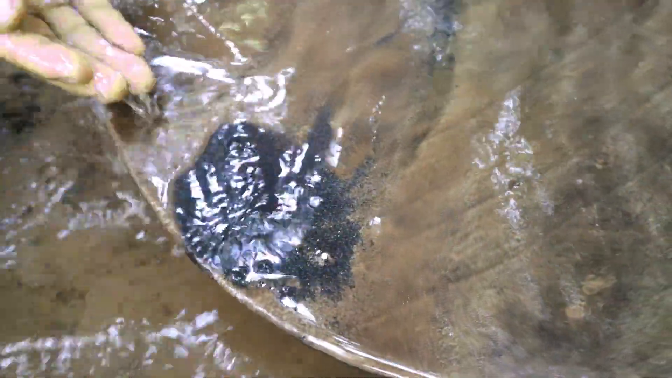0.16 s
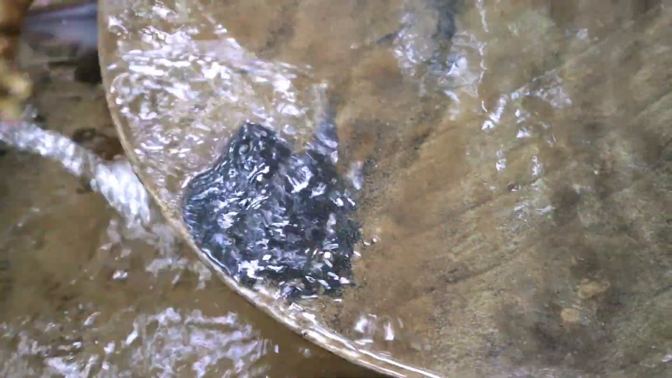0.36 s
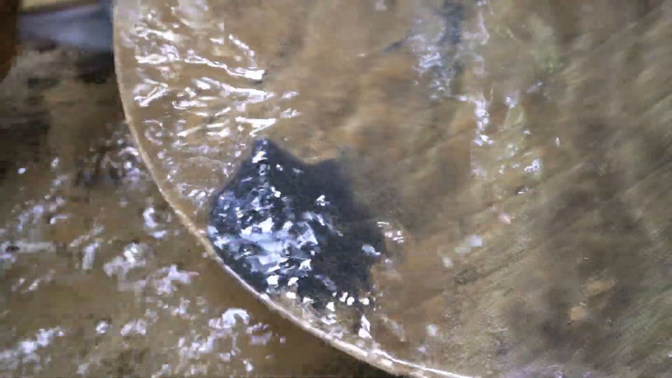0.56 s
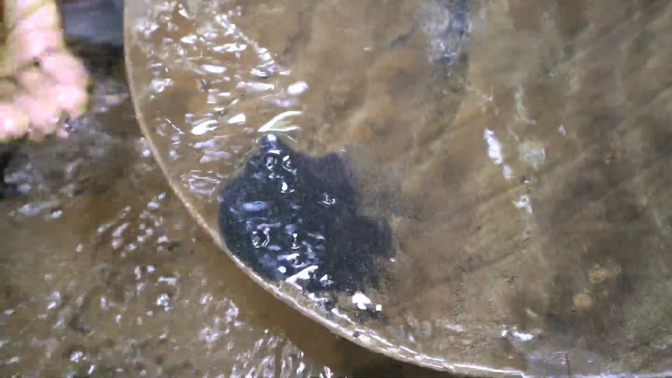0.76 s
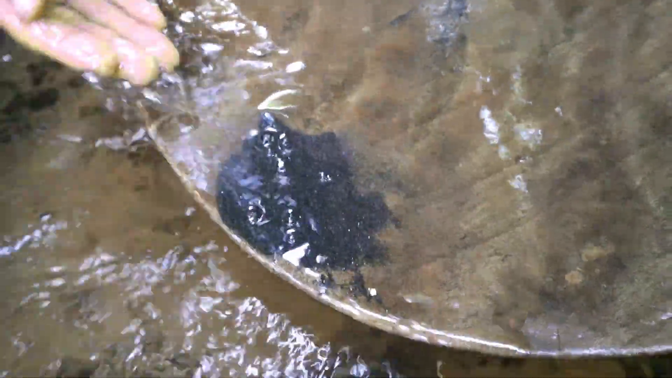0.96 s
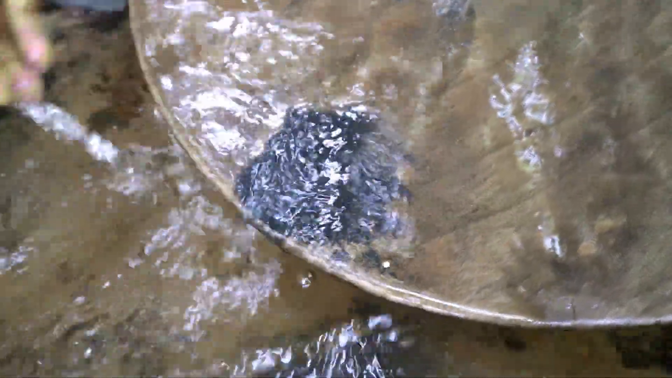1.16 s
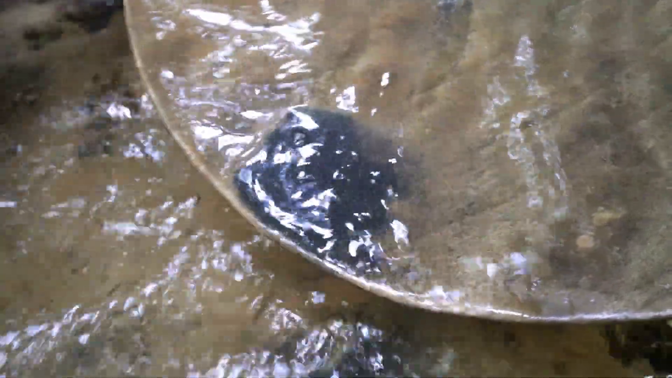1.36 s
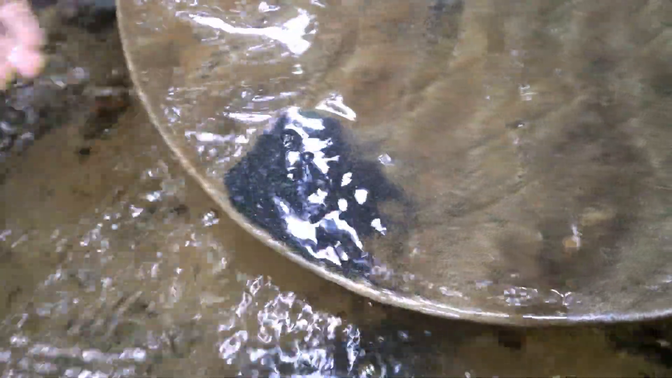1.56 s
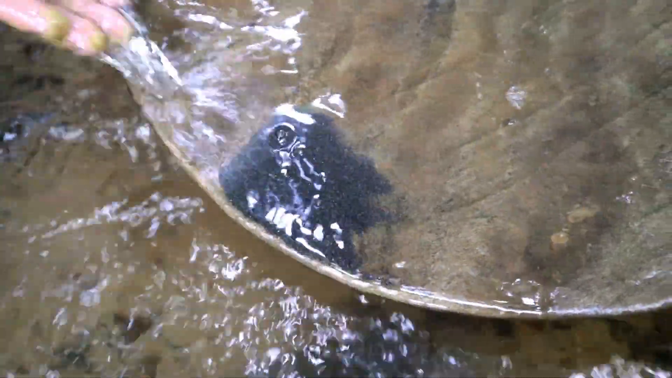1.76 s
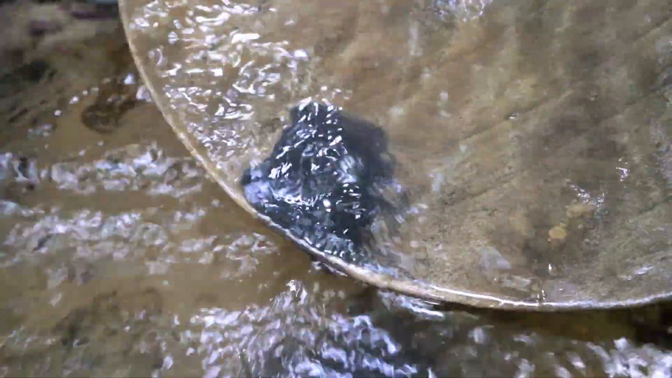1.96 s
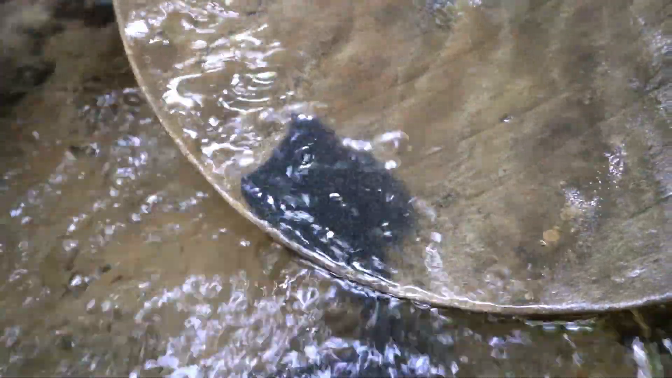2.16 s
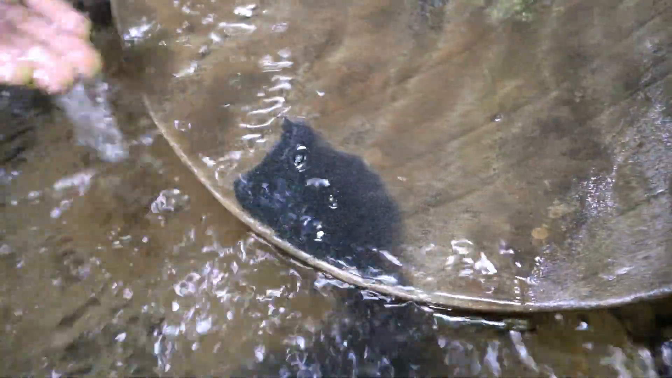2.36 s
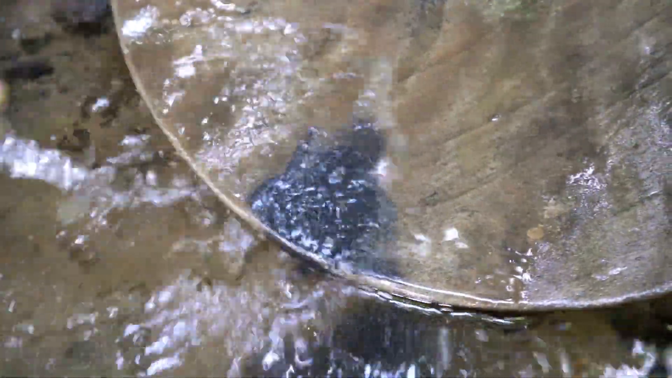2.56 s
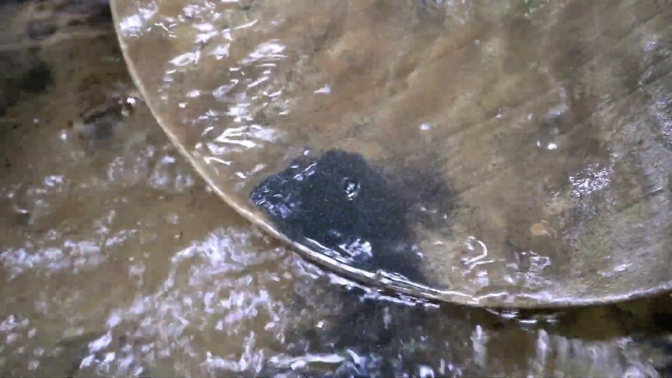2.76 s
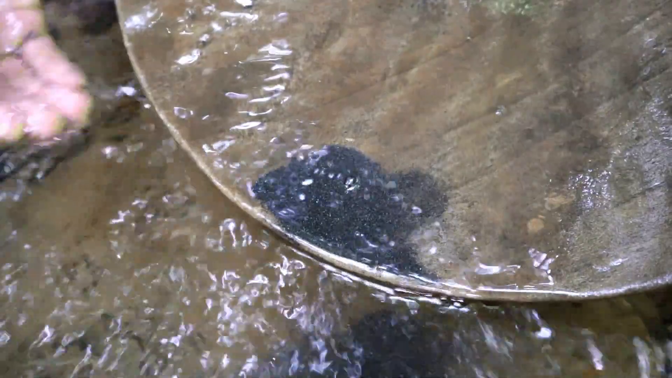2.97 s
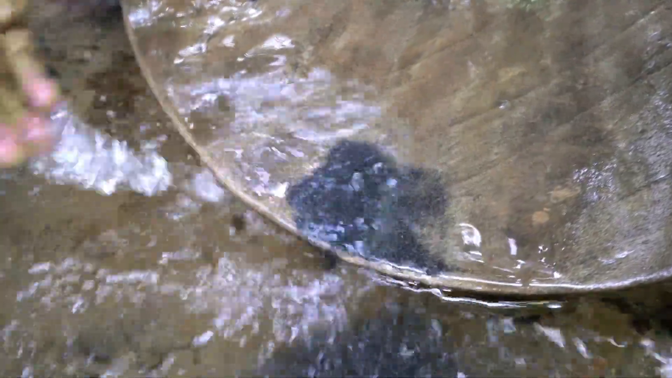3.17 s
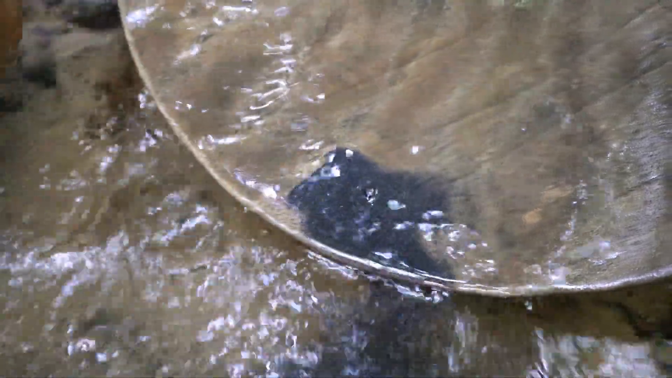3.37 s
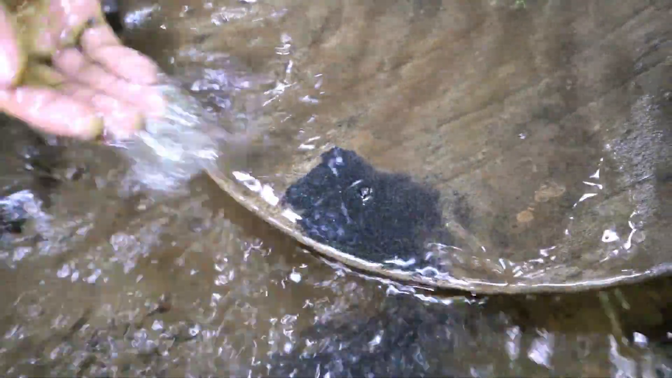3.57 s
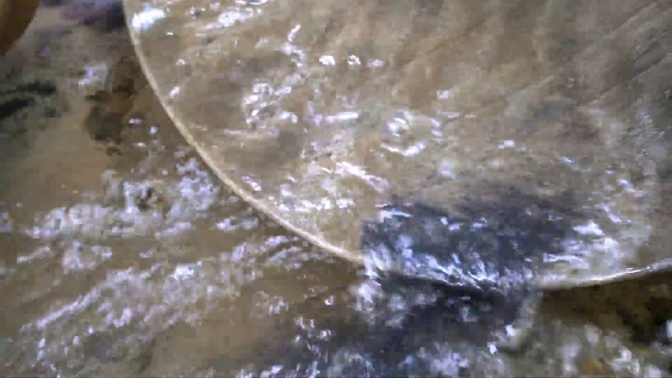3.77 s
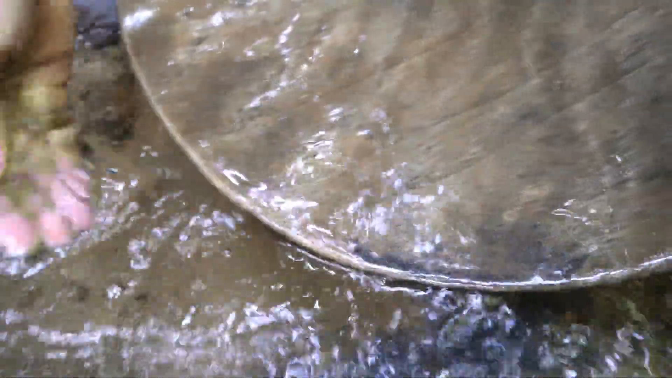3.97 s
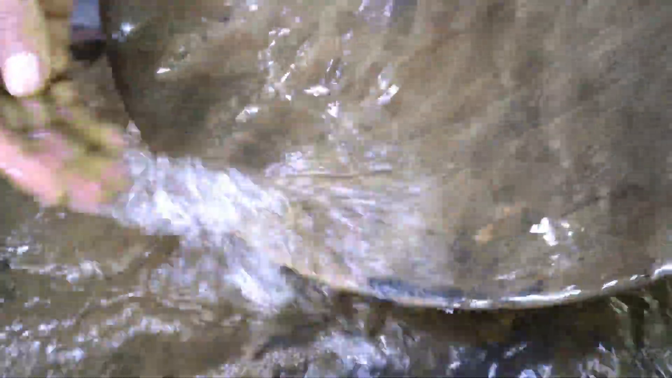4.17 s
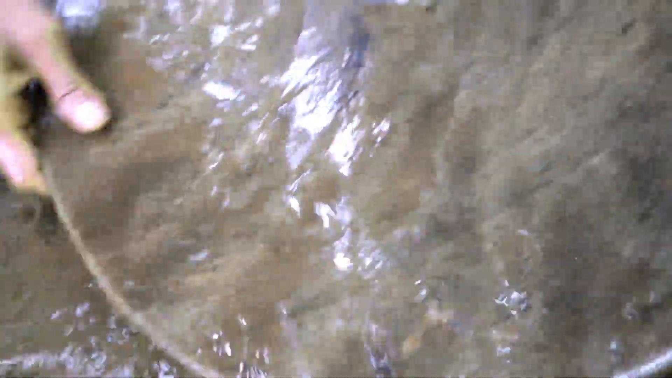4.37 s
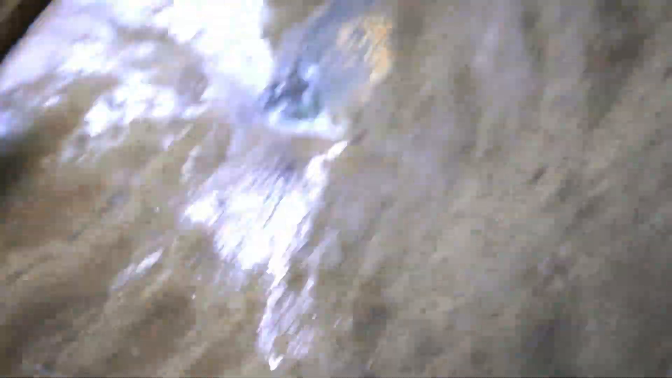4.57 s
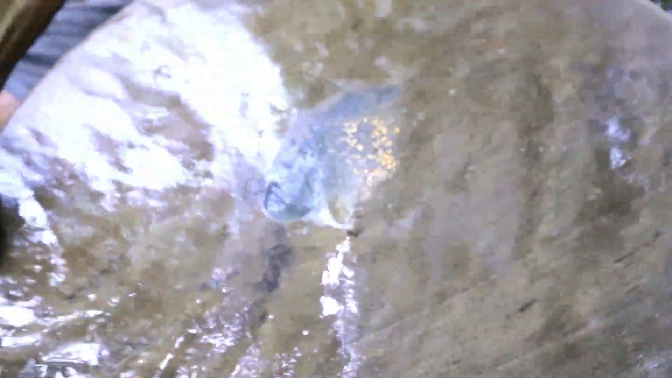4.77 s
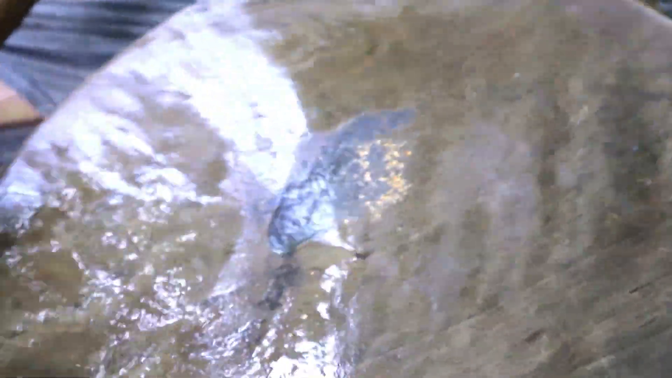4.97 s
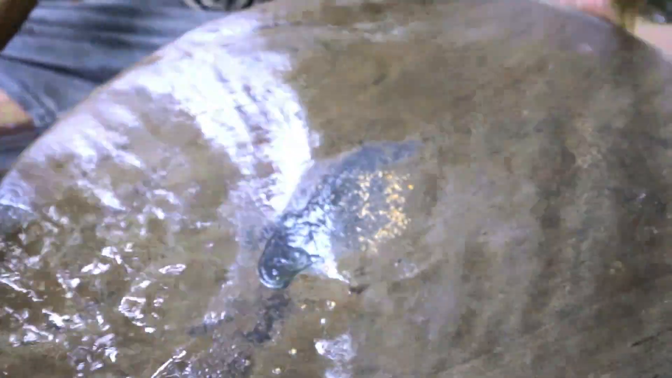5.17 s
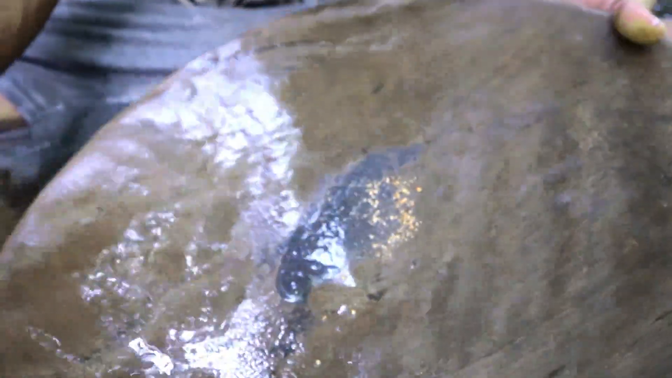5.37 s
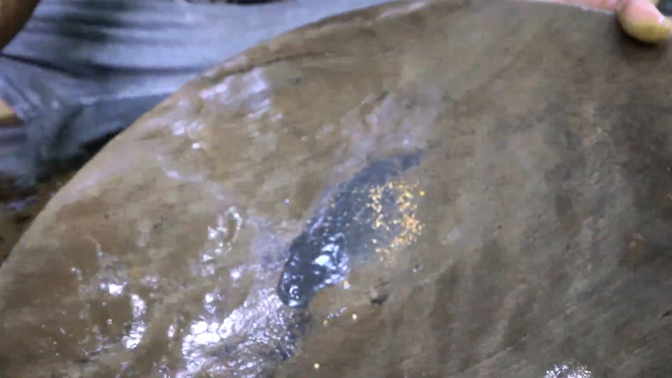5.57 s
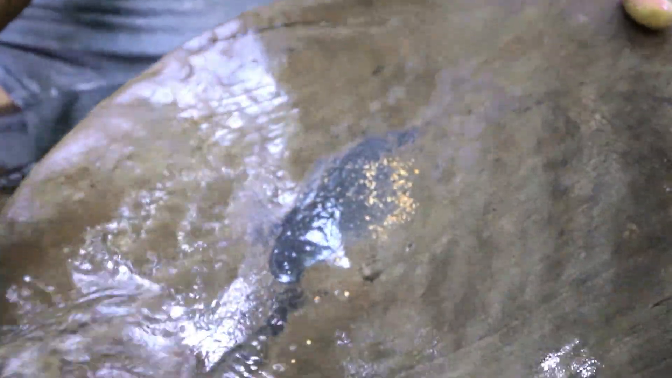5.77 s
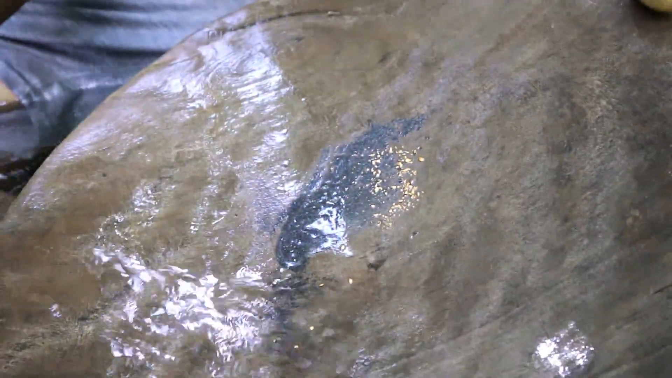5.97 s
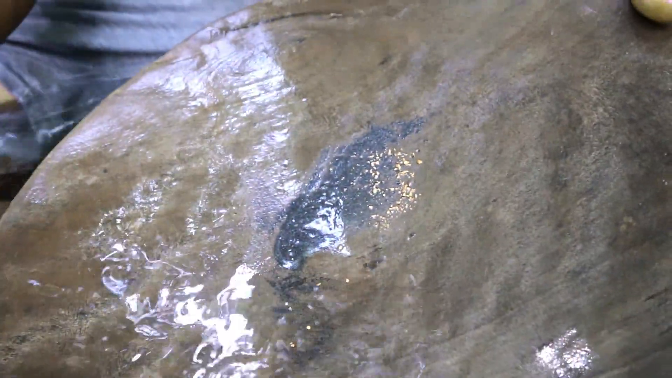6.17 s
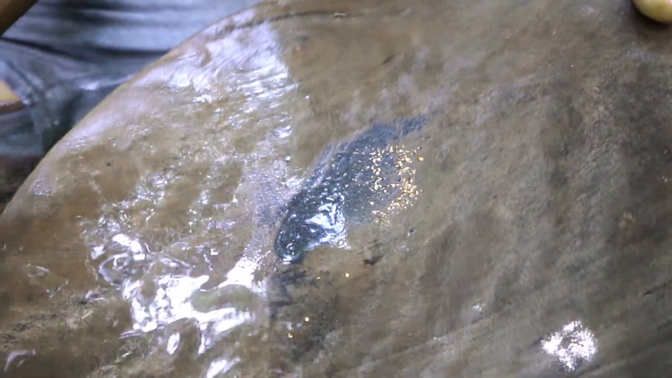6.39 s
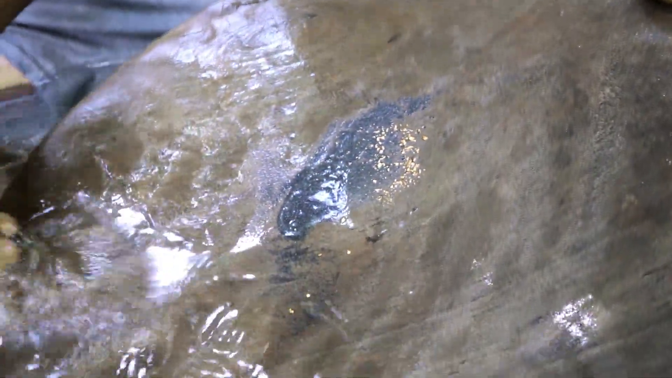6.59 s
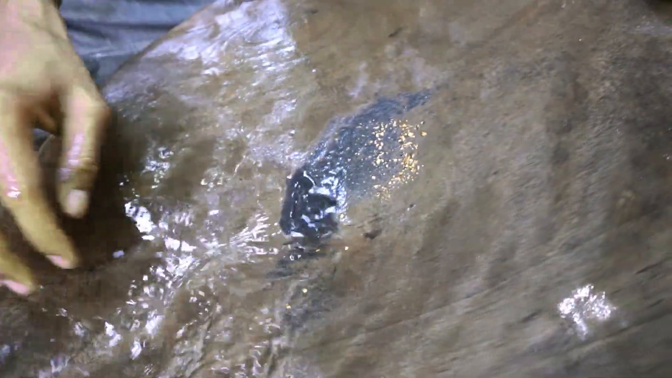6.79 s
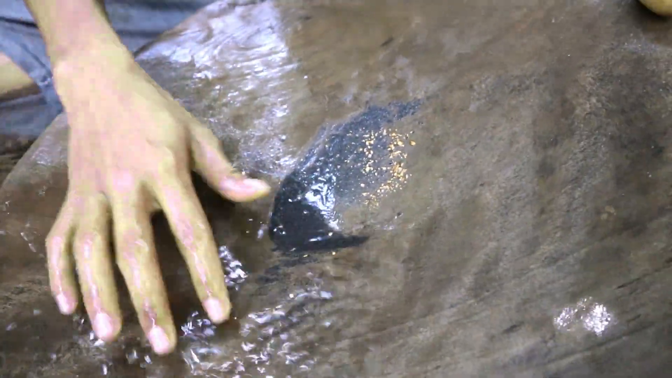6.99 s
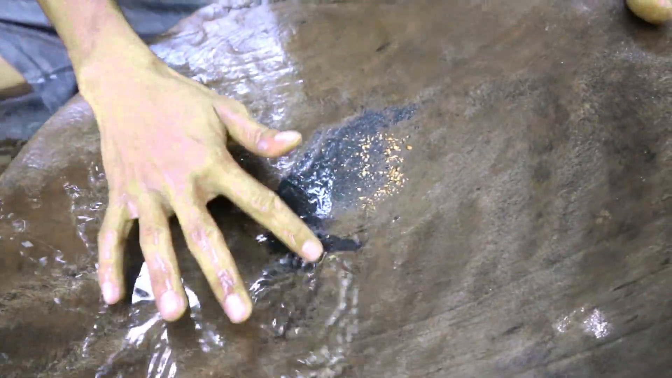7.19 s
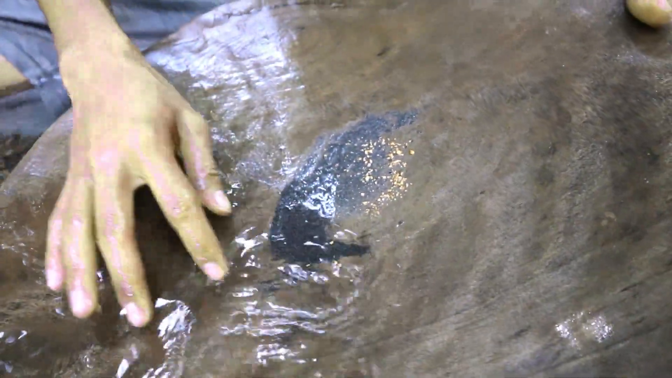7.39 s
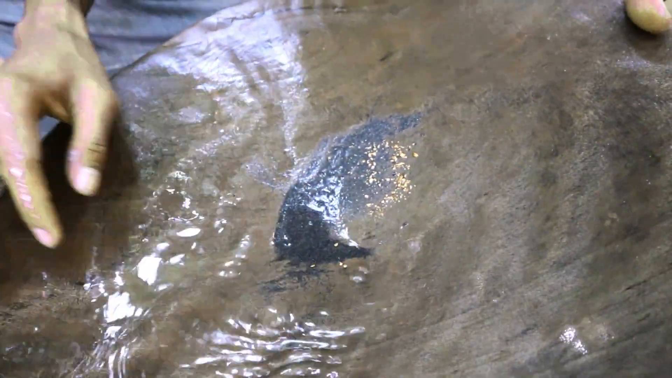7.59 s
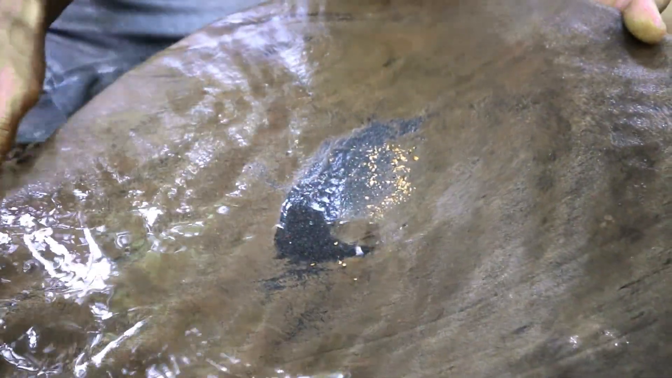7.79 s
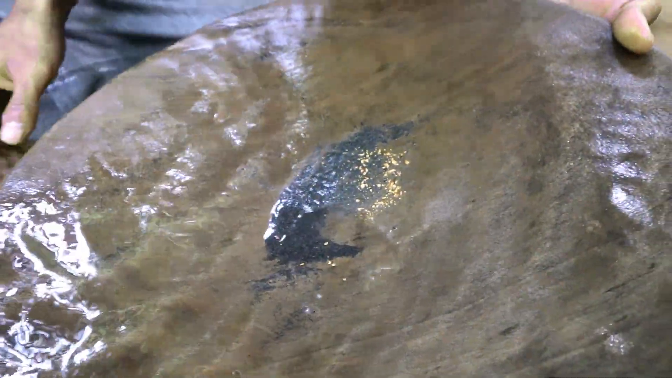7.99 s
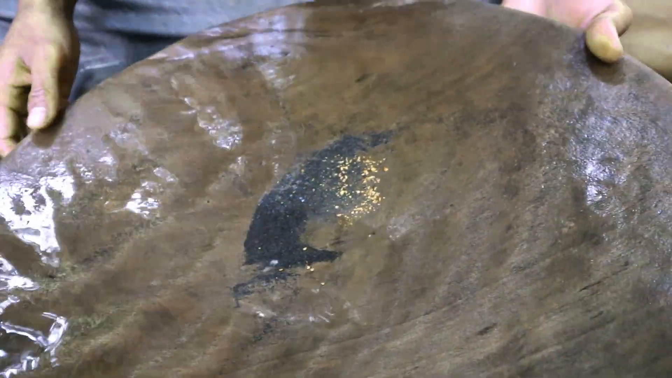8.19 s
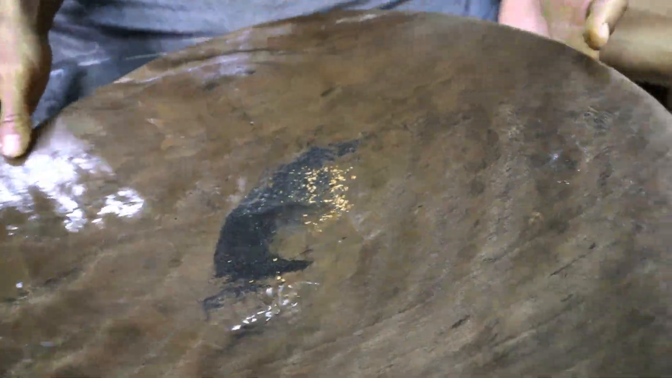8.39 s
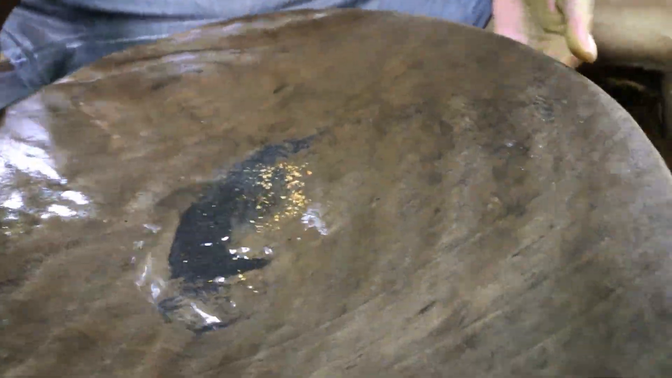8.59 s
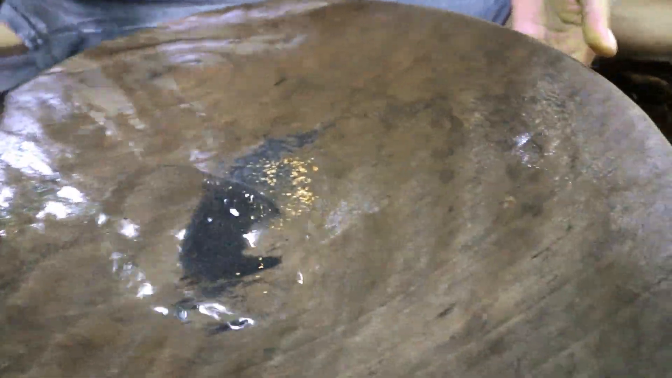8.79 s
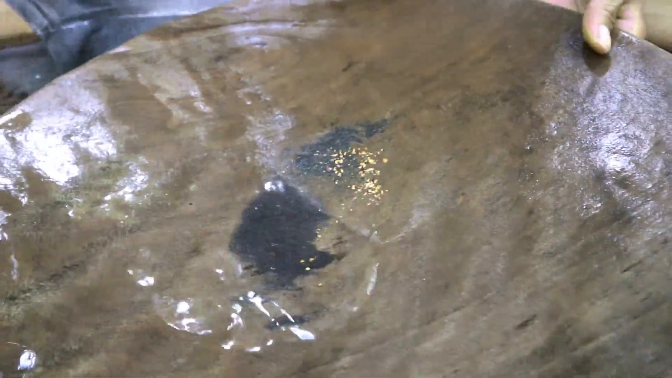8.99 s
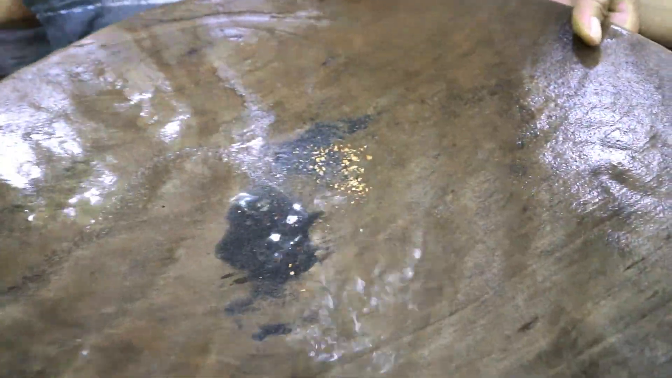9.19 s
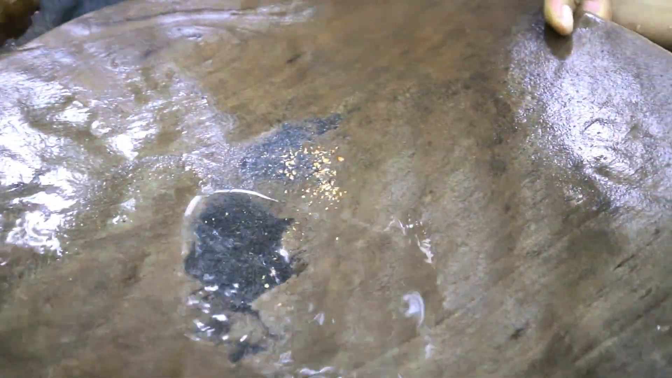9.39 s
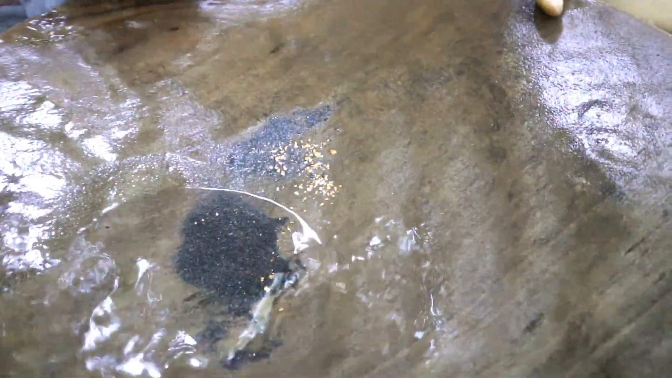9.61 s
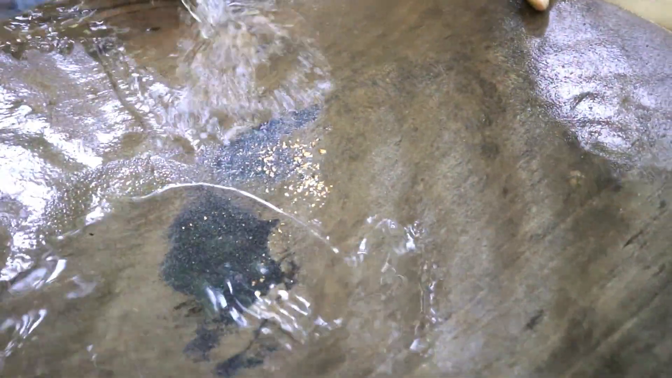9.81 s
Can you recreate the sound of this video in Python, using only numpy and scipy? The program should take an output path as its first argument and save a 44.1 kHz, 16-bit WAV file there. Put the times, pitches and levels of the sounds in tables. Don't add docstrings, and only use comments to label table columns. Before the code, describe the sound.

Outdoor forest stream, close stereo pickup. A high fast cricket trill and hissy insect choruses run steadily over faint low water wash. A rasping cicada buzz breaks off at once, followed by a nasal drone, a rising whistle-like glide, a short buzz and a long drone. In front, irregular scoops plop and ring, then a lifted pan glugs, bumps and splashes, thinning to sparse drips.

```python
import sys
import numpy as np
from scipy import signal
from scipy.fft import rfft, irfft, next_fast_len
from scipy.io import wavfile
from scipy.ndimage import uniform_filter1d

SR = 44100
rng = np.random.default_rng(int(sys.argv[2]) if len(sys.argv) > 2 else 0)


def master_out(mix):
    frames = np.transpose(np.atleast_2d(mix))
    ceiling = np.clip(frames, -1, 1)
    pcm = np.round(ceiling * 32767).astype(np.int16)
    wavfile.write(sys.argv[1], SR, pcm)


def level_to_linear(level):
    exponent = np.asarray(level, float) / 20
    return 10 ** exponent


N = 434385


def read(points, hz):
    f, value = np.transpose(points)
    return np.interp(np.log(hz + 1), np.log(f + 1), value)


def follow(rows):
    s, *columns = np.transpose(rows)
    t = np.arange(max(s[0], 0), s[-1], 1 / SR)
    return round(t[0] * SR), *(np.interp(t, s, c) for c in columns)


def evened(x):
    return x / np.sqrt(np.mean(abs(x) ** 2) + 1e-20)


def add(mix, start, sound):
    part = mix[..., start:start + sound.shape[-1]]
    part += sound[..., :part.shape[-1]]


def panned(x, left_right_db):
    return x * level_to_linear(np.array([[left_right_db], [-left_right_db]]) / 2)


def drift(size, width_hz):
    step, settle = 10, 900
    coarse = size // step + 2
    r = np.exp(-np.pi * width_hz * step / SR)
    z = rng.standard_normal(coarse + settle) + 1j * rng.standard_normal(coarse + settle)
    z = signal.lfilter([1], np.convolve([1, -r], [1, -r]), z)[settle:]
    return evened(np.interp(np.arange(size) / step, np.arange(coarse), z))


def tone(hz, fuzz, width_hz):
    fuzz = np.clip(fuzz, 0, 1)
    wobble = np.sqrt(1 - fuzz) + np.sqrt(fuzz) * drift(len(hz), width_hz)
    carrier = np.exp(2j * np.pi * (np.cumsum(hz) / SR + rng.random()))
    return np.sqrt(2) * (wobble * carrier).real


def forest(x, pan_db, wet_db):
    t60_s = 0.58
    t = np.arange(SR // 2) / SR
    tail = rng.standard_normal((2, len(t))) * (rng.random((2, len(t))) < .05) * level_to_linear(-60 * t / t60_s)
    tail /= np.linalg.norm(tail, axis=1)[:, None]
    return panned(x, pan_db) + level_to_linear(wet_db) * signal.fftconvolve(x[None], tail, axes=1)[:, :N]


def bubble(db, hz, t60_s, rise_per_s):
    t = np.arange(round(0.55 * t60_s * SR)) / SR
    bent_t = t + rise_per_s * np.minimum(t, .03) * t / 2
    ring = np.sin(2 * np.pi * hz * bent_t) * level_to_linear(-60 * (t / t60_s) ** 1.31)
    tick = evened(uniform_filter1d(rng.standard_normal(len(t)), size=1 + int(7000 / hz)))
    tick *= np.exp(-t / 0.0022) * level_to_linear(-17.0 + 7.7 * np.log2(hz / 1000))
    return level_to_linear(db - 1.5) * (ring * (1 - np.exp(-t / 0.00043)) + tick)


# (time [s], peak [dB], pitch [Hz], pitch ratio to next smaller, left-right [dB])
SLAPS = [
    (.843, -29.5, 902, 1.6, 7),
    (1.026, -32, 1244, 1.22, -2),
    (1.813, -25.5, 814, 2.07, 2),
    (3.698, -27, 1057, 1.46, 0),
    (4.772, -34.5, 1130, 2.2, -2),
    (4.812, -24.5, 1526, 0.91, -2),
    (5.755, -34.5, 556, 2.5, 2),
    (5.803, -30.5, 726, 1.07, -7),
    (6.76, -19, 873, 1.51, -4.5),
]
# (time [s], peak [dB], pitch [Hz], t60 [s], pitch rise [1/s])
GULPS = [(0.184, -25, 1107, 0.056, -0.5), (.224, -37.5, 728, .084, -1), (0.298, -23, 655, 0.12, -2.5),
         (0.297, -32, 750, 0.046, -3), (.08, -40.5, 697, 0.028, -1), (1.045, -47.5, 779, 0.19, 0.5),
         (.345, -39, 653, 0.11, 7.5), (.374, -36.5, 690, 0.059, 4), (1.519, -30.5, 1100, 0.034, 24),
         (1.825, -32, 777, 0.089, -1), (3.084, -47, 1450, .03, 15), (3.108, -46.5, 1000, .07, 11.5),
         (3.179, -44, 920, .07, 5), (3.228, -39, 1080, 0.1, 17), (3.4, -49, 620, .03, 20),
         (3.575, -46, 790, .06, 14), (3.466, -35, 480, 0.035, 32), (3.48, -36.5, 510, 0.059, 32),
         (3.522, -36, 750, .06, -10.5), (3.61, -45.5, 1050, 0.15, 1), (3.725, -40, 700, 0.049, 11.5),
         (5.753, -27, 930, 0.0082, 0), (4.207, -36, 3300, .008, 0), (3.5, -20.5, 706, 0.035, 32.5),
         (3.698, -31, 643, 0.076, 5), (3.743, -36.5, 940, 0.05, 2), (4.004, -26, 568, 0.074, 29),
         (4.075, -43.5, 398, 0.12, 12), (4.155, -35.5, 1355, 0.08, -5), (4.424, -26.5, 505, 0.041, 26),
         (5.193, -41, 540, .07, 3.5), (5.209, -33, 590, 0.063, 0), (5.219, -36.5, 600, 0.051, -3),
         (5.36, -37, 1450, .035, 0), (5.372, -36, 1210, 0.043, 9), (5.389, -36, 1470, .05, 3),
         (5.503, -47, 816, 0.048, -2), (5.636, -52, 520, 0.057, 8), (5.412, -21, 1540, 0.031, -3.5),
         (8.81, -39, 412, 0.07, -3.5), (9.006, -37, 1002, 0.093, 2), (9.009, -42.5, 425, 0.12, -5),
         (9.008, -36.5, 1506, 0.046, 19), (9.373, -41.5, 1068, 0.1, 12.5)]
# (time [s], peak [dB], pitch [Hz], left-right [dB])
PLINKS = [(.165, -37, 1200, 2), (.181, -38, 2050, -6), (.266, -34.5, 1140, 1), (0.373, -35, 1170, 0),
          (.466, -32, 1120, 2), (.476, -30.5, 1170, 1), (.964, -33.5, 1735, -2),
          (1.042, -35, 2120, -6), (1.066, -33, 1310, 2), (1.138, -38.5, 1320, 1),
          (1.28, -40, 1630, -2), (1.365, -35, 3730, 2), (1.561, -37, 2420, 6),
          (1.577, -35.5, 1244, -2), (1.97, -34.5, 2850, -3), (1.999, -41, 654, -2),
          (2.359, -36, 2030, 1), (2.595, -29, 1600, 0), (2.62, -29, 860, 3), (2.889, -37, 1080, 4),
          (2.96, -39, 1700, 0), (3.208, -24.5, 2480, -3), (3.263, -32, 1900, -3),
          (3.553, -34.5, 1850, 9), (3.594, -35, 1570, 6), (3.696, -33, 2020, -3),
          (3.721, -39, 2600, -1), (3.765, -42, 1420, -2), (3.799, -40, 2610, -3),
          (4.208, -32, 3300, 0), (4.218, -39, 688, 1), (4.219, -30, 3460, -8), (4.256, -35, 740, -2),
                (4.279, -28, 2030, -10), (4.32, -33, 2900, -4), (4.44, -42, 560, 0),
                (4.488, -30.5, 607, -1), (4.662, -37, 575, -1), (4.812, -31, 473, -1),
                (5.324, -47, 1163, -13), (5.428, -35, 1290, 9), (5.454, -40, 1420, 11),
                (5.521, -36, 2330, 4), (5.791, -28, 1090, -9), (5.798, -33, 2060, -6),
                (5.799, -30, 2530, -5), (5.848, -43, 1293, 5), (5.884, -32.5, 1330, 9),
                (6.42, -43, 3540, 4), (6.459, -39.5, 645, -1), (6.618, -37, 1213, 3), (9.325, -37, 2310, 1),
                (9.399, -45, 1150, -7), (9.464, -40, 406, -1), (9.481, -36.5, 2130, -1),
                (9.599, -37, 1800, 1)]
RISE_PER_S = 3.3


def clear_bubbles():
    slap_t60_s, smaller_db, smaller_lead_s = 0.028, -6, 0.00014
    plink_t60_s, shorter_per_db = 0.035, 0.55
    rows = []
    for s, db, hz, ratio, pan_db in SLAPS:
        for k in range(4):
            rows.append((s - k * smaller_lead_s, db + k * smaller_db, hz * ratio ** k,
                         slap_t60_s, RISE_PER_S, pan_db))
    rows += [(*row, 2) for row in GULPS]
    for s, db, hz, pan_db in PLINKS:
        t60_s = plink_t60_s * level_to_linear(-shorter_per_db * (db + 41.0))
        rows.append((s, db, hz, t60_s, RISE_PER_S, pan_db))
    return rows


def slap_cracks(out):
    crack_db, crack_s = -15.0, .0016
    for s, db, *_ in SLAPS:
        noise = uniform_filter1d(rng.standard_normal((2, 301)), size=4)
        crack = evened(np.diff(uniform_filter1d(noise, size=3)))
        decay = np.exp(-np.arange(300) / SR / crack_s)
        add(out, round((s - .0024) * SR), level_to_linear(db + crack_db) * crack * decay)


# (time [s], peak [dB], pitch [Hz])
DROPS = [
    (.022, -40.5, 1480),
    (.117, -42, 1190),
    (.156, -42, 5660),
    (.34, -31.5, 3920),
    (3.698, -27.5, 4530),
]
# (time [s], peak [dB], pitch [Hz])
SPRAY = [(0.5604, -40, 3620), (0.815, -38.5, 3340), (1.253, -45, 3480), (.925, -47, 3050),
         (1.35, -46, 3810), (2.043, -45, 2570), (2.4668, -42.5, 2360), (2.5546, -40.5, 2600),
         (3.798, -37, 2530), (1.768, -47, 2950), (1.852, -45, 1600), (1.348, -45.5, 1450),
         (8.534, -46, 2370), (8.6526, -45, 3200), (9.0194, -43, 2350), (9.5412, -44, 2380),
         (9.607, -42, 2800), (9.635, -40, 2880), (9.6652, -38, 3040)]
# (time [s], peak [dB], pitch [Hz])
DRIPS = [(0.85, -37.5, 755), (1.028, -38, 800), (6.3, -45, 1300), (8.26, -46.5, 1220), (8.395, -47, 640),
         (8.1, -46, 1150), (6.6, -49, 890), (6.342, -51, 1170), (6.416, -44, 1050), (4.081, -41, 1330),
         (.828, -37.5, 1200), (1.793, -42, 1154), (3.58, -44, 875), (1.14, -46, 740), (1.996, -37, 1450),
         (2.204, -40.5, 665), (2.349, -41, 1100), (2.934, -42, 860), (8.969, -43, 790), (9.37, -34.5, 930)]
# (time [s], peak [dB], pitch [Hz])
GLUGS = [(4.466, -40, 602), (4.603, -42.5, 630), (4.635, -42, 546), (4.66, -35.5, 522), (4.758, -42, 384),
         (4.809, -37, 419), (4.928, -43, 590), (4.982, -41, 538), (5.163, -42, 383), (5.209, -41, 603),
         (5.289, -41.5, 370), (3.4567, -54, 1080), (3.4906, -41, 1040), (3.551, -40, 1880),
         (3.5739, -35, 2090), (3.5929, -34, 1540), (3.6777, -37, 1190), (3.6942, -22, 1002),
         (3.7406, -42, 1000), (3.7635, -43, 1350), (3.7889, -34, 1990), (5.2864, -42, 1200),
         (5.3228, -46, 1190), (5.3577, -39, 1450), (5.4096, -33, 1480), (5.5213, -37, 1550),
         (5.7523, -40, 1670), (5.7523, -34, 1710), (5.7892, -36, 1120), (5.8456, -44, 1210),
         (5.881, -42, 1310)]


def drops_and_glugs(out):
    for s, db, hz in DROPS:
        add(out, round((s - .002) * SR), bubble(db, hz, 70 / hz, 0))
    for s, db, hz in SPRAY:
        add(out, round((s - .001) * SR), bubble(db + 2, hz, 60 / hz, RISE_PER_S))
    for s, db, hz in DRIPS:
        add(out, round((s - .001) * SR), bubble(db - 2, hz, 0.036, RISE_PER_S))
    for s, db, hz in GLUGS:
        add(out, round(s * SR), bubble(db - 3, hz, 44 / hz, 5.1))


# (time [s], level [dB])
CHURN = [(0, -62.5), (2.4, -67.5), (2.6, -60.5), (2.9, -68.5), (3.5, -61.5), (4.3, -61), (4.5, -62),
         (4.56, -67), (4.64, -58), (5.3, -58.5), (5.5, -62), (6.2, -66), (6.6, -61.5), (6.9, -69),
         (8.2, -69.5), (8.9, -63.5), (9.85, -67.5)]


def busyness(hz):
    before_ms, after_ms = 13, 22.0
    ms = np.arange(N * 1000 // SR + 2) / 1000
    size_db = -(6 if hz < 650 else .9) * np.log2(hz / 650) ** 2
    churn = level_to_linear(np.interp(ms, *np.transpose(CHURN)) + 60.0 + size_db)
    s, db, pitch = np.transpose([row[:3] for row in [*clear_bubbles(), *SPRAY, *DRIPS]])
    weight = level_to_linear(0.32 * (db + 40.5) - 6.0 * np.log2(hz / pitch / 1.45) ** 2)
    marks = np.bincount(np.round((s + .004) * 1000).astype(int), weight, len(ms))
    lag_ms = np.arange(-150, 151)
    reach = np.exp(-np.maximum(lag_ms / after_ms, -lag_ms / before_ms))
    flurry = np.convolve(marks, reach, "same")
    return np.interp(np.arange(N) / SR, ms, churn + 0.5 * flurry)


def swarm():
    out = np.zeros((2, N))
    for hz in np.geomspace(340, 9000, num=24):
        busy = busyness(hz)
        odds = 50 * np.minimum(busy, 3) ** 1.5 * (hz / 1000) ** 0.63 / SR
        births = rng.random(N) < odds
        births = births * level_to_linear(3.4 * np.minimum(rng.exponential(1, N), 3.5)) * busy ** .6
        side = rng.uniform(0.026, 1, (2, N))
        shape = bubble(-55 - 0.15 * np.log2(hz / 1000), hz, 18 / hz + 0.011, rng.uniform(-9, 14.5))
        out += signal.oaconvolve(births * side, shape[None], axes=1)[:, :N]
    return out


def water():
    out = np.zeros((2, N))
    for s, db, hz, t60_s, rise_per_s, pan_db in clear_bubbles():
        sound = bubble(db, hz, max(t60_s, .008), rise_per_s)
        add(out, round((s - .0022) * SR), panned(sound, pan_db))
    drops_and_glugs(out)
    slap_cracks(out)
    out += swarm()
    return out + level_to_linear(-24.0) * forest(out.mean(0), 0, 0)


# (time [s], peak [dB], centre [Hz])
TICKS = [(0.3361, -32, 3520), (0.8425, -30.5, 2550), (0.9712, -40, 2610), (1.0221, -42, 2340),
         (1.1348, -37, 3360), (1.2261, -38, 3510), (1.276, -37, 2730), (1.3284, -34, 3390),
         (1.5238, -34.5, 2580), (1.5565, -33, 2440), (1.81, -47, 3350), (1.9564, -35, 2790),
         (1.9964, -49, 3350), (2.5935, -39, 2635), (2.614, -38, 2770), (3.5094, -46, 2870),
         (3.694, -29, 3010), (3.7194, -35, 2600), (4.1515, -46, 2460), (4.206, -32, 3570),
         (4.2174, -39, 3430), (4.2612, -40, 3370), (4.2782, -42, 3030), (4.3046, -35, 3070),
         (4.3196, -35, 2450), (5.1567, -47, 3330), (5.2415, -48, 3380), (5.2844, -37.5, 2300),
         (5.3797, -45, 2390), (5.4076, -38, 2690), (5.467, -37, 2690), (5.5197, -38, 2420),
         (5.7952, -39, 2500), (5.8474, -46, 2320), (6.0648, -37, 2960), (6.0896, -28.5, 4300),
         (6.4183, -42, 2880), (6.9477, -36.5, 3100), (7.9798, -46, 2940), (9.0054, -42, 2350),
         (9.6574, -34, 3130)]


def ticks():
    out, t = np.zeros((2, N)), np.arange(-200, 400) / SR
    for s, db, hz in TICKS:
        body = np.sin(2 * np.pi * hz * t) * np.exp(-(t * hz / 1.6) ** 2 * np.where(t < 0, 8, 1))
        hiss = np.diff(rng.standard_normal((2, len(t) + 1))) / 2
        hiss = hiss * np.exp(-abs(t) / np.where(t < 0, .0002, .0012))
        snap = body + level_to_linear(-1) * uniform_filter1d(hiss, size=3)
        add(out, round((s + 0.00109) * SR) - 200, level_to_linear(db + 3) * snap)
    return out


# (start [s], length [s], level [dB], centre [Hz])
FIZZ = [(4.758, 0.03, -46.5, 1700), (3.9, 0.05, -51, 900), (5.355, .12, -47.5, 2200),
        (4.24, .09, -49, 1700), (5.78, 0.036, -44, 1400), (1.02, .06, -52, 1700), (4.62, .06, -51, 1150),
        (6.1, .02, -55, 1300), (3.5, .04, -53, 800), (4.67, 0.062, -52.5, 670), (8.94, .07, -53, 900),
        (2.58, .05, -47.5, 3300), (9.0, 0.045, -48.5, 1000)]


def fizz():
    clicks_per_s, db_per_octave2 = 450, -6
    out = np.zeros((2, N))
    for s, length_s, db, hz in FIZZ:
        size = round(length_s * SR)
        clicks = rng.standard_normal((2, size)) * (rng.random(size) < clicks_per_s / SR)
        clicks = clicks * np.sqrt(np.hanning(size))
        octaves = np.log2((np.fft.rfftfreq(size, 1 / SR) + 1) / hz)
        colour = level_to_linear(db_per_octave2 * octaves ** 2) * np.exp(-.6j * np.pi * octaves)
        shared = clicks + clicks[::-1] / 2
        add(out, round(s * SR), level_to_linear(db) * evened(irfft(rfft(shared) * colour, size)))
    return out


# (time [s], peak [dB], swing [Hz])
BUMPS = [
    (4.418, -40, 110),
    (4.66, -35.5, 47.3),
    (4.841, -46, 46.4),
    (4.987, -42, 47.3),
    (5.138, -47, 43.5),
]


def bumps():
    out, t = np.zeros(N), np.arange(5000) / SR
    for s, db, hz in BUMPS:
        envelope = np.exp(-t * hz / 0.64) * (1 - np.exp(-t / 0.0012))
        add(out, round(s * SR), -level_to_linear(db + 10.0) * np.sin(2 * np.pi * hz * t) * envelope)
    return out


# (time [s], pitch [Hz], level [dB])
DRONE = [
    [(.38, 1850, -55), (.45, 1815, -55), (1.5, 1826, -53), (2.62, 1820, -51.5), (2.7, 1850, -57)],
    [(3.84, 1915, -58), (3.95, 1830, -53.5), (4.6, 1822, -56.5), (5, 1812, -54), (6.5, 1825, -54),
     (7.5, 1846, -54.5), (8.3, 1845, -57.5), (9.1, 1852, -56.5), (9.85, 1908, -58)],
]


def cicada_drone():
    out = np.zeros(N)
    for rows in DRONE:
        start, hz, db = follow(rows)
        add(out, start, level_to_linear(db) * tone(hz, .35, 65))
    return forest(out, -1.5, -8)


# (time [s], pitch [Hz], level [dB])
GLIDE = [(2.695, 2500, -60), (2.732, 2760, -44), (2.76, 2800, -54), (2.795, 2858, -43), (2.86, 2910, -50),
         (2.96, 2930, -41), (3.1, 2948, -49), (3.32, 2972, -37.5), (3.42, 2966, -59)]


def cicada_glide():
    out = np.zeros(N)
    start, hz, db = follow(GLIDE)
    sides = level_to_linear(-5.5) * tone(hz - 308, 0.21, 11.0) + level_to_linear(-5.0) * tone(hz + 308, 0.22, 23)
    sides += level_to_linear(-14) * tone(hz + 616, .3, 12)
    near = tone(hz - 154, 0.85, 24.5) + tone(hz + 154, 0.46, 30) + tone(hz, 1, 400)
    main = tone(hz, 0.15, 23) + level_to_linear(-8.5) * tone(hz, 1, 90) + level_to_linear(-16.0) * near
    add(out, start, level_to_linear(db) * main + level_to_linear(0.5 * db - 27.5) * sides)
    return forest(out, -4.5, -11)


# (time [s], level [dB], click rate [1/s], extra on sharpest ring [dB])
BUZZ = [
    [(0, -43, 151.75, 0), (.28, -43.5, 151.8, -2), (.44, -62, 151.8, -6)],
    [(3.325, -56, 151.2, -8), (3.39, -43, 151.3, -8), (3.55, -43, 151.45, -6), (3.72, -43, 151.6, 2),
     (3.8, -44, 151.6, -6), (3.87, -56, 151.6, -8)],
]
# (centre [Hz], width [Hz], level [dB])
BELLY = [(2580, 120, -9), (2880, 120, -8), (3185, 120, -8), (3000, 900, -20), (4700, 80, -12),
         (5005, 70, -1), (5160, 90, -6), (5310, 90, -4), (5610, 200, -9), (5760, 70, 2), (5800, 1700, -12),
         (6065, 80, -8), (6365, 90, -8), (8300, 500, -26)]


def cicada_buzz():
    ring_hz = 5760
    out = np.zeros(N)
    for rows in BUZZ:
        start, db, rate, ring_db = follow(rows)
        comb = 0
        for k in range(15, 60):
            line_hz = k * rate[0]
            gain = sum(level_to_linear(d) / (1 + ((line_hz - f) / w * 2) ** 2) for f, w, d in BELLY)
            gain = gain * level_to_linear(ring_db * (abs(line_hz - ring_hz) < 60))
            comb = comb + gain * (tone(k * rate, .3, 5) + level_to_linear(-7) * tone(k * rate, 1, 140))
        add(out, start, level_to_linear(db) * evened(comb))
    left, right = forest(out, -4, -11)
    return np.array([left, np.roll(right, -1)])


# (time [s], level [dB])
CRICKET = [(0, -46), (1, -44), (2.2, -42.5), (3.5, -44.5), (4.5, -46.5), (5.6, -44.5), (6.5, -48.5),
           (8, -45), (8.8, -48), (9.85, -43)]
# (time [s], pitch [Hz])
WING_HZ = [(0, 4283), (2, 4288), (5, 4290), (8.7, 4296), (9.2, 4308), (9.85, 4333)]
TRILL = [-11, 0, -2, -2.5, -11, -11, -15]


def cricket():
    t = np.arange(N) / SR
    hz, db = np.interp(t, *np.transpose(WING_HZ)), np.interp(t, *np.transpose(CRICKET))
    stroke = 2 * np.pi * 42.1 * t
    wing = np.exp(2j * np.pi * np.cumsum(hz) / SR)
    lines, halves = 0, 0
    for k, d in enumerate(TRILL):
        sweep = .24 * (k - 2) ** 2
        lines = lines + level_to_linear(d) * np.exp(1j * (stroke * (k - 2) + sweep)) * (1 + .33 * drift(N, 1))
        halves = halves + level_to_linear(d - 13) * np.exp(1j * stroke * (k - 2.5)) * drift(N, 5)
    haze = [level_to_linear(-7) * tone(hz + 30, 1, 190) for port in range(2)]
    return level_to_linear(db) * evened(forest((wing * (lines + halves)).real, -.6, -13) + haze)


# (time [s], pitch [Hz], level [dB])
FAR_GLIDE = [
    [(6.0, 2750, -75), (6.15, 2836, -65), (6.5, 2916, -61.5), (6.7, 2950, -69)],
    [(9.55, 2790, -63), (9.7, 2880, -64), (9.85, 2840, -64)],
]


def far_cicada():
    out = level_to_linear(-69.0) * tone(np.full(N, 2160.), 0.85, 80) + level_to_linear(-64.5) * tone(np.full(N, 3450.), 1, 540)
    for rows in FAR_GLIDE:
        start, hz, db = follow(rows)
        add(out, start, level_to_linear(db) * tone(hz, .9, 90))
    return forest(out, 0.5, -0.0091)


# (time [s], centre [Hz], density [dB per Hz])
CHORUS = [(0, 10000, -92), (.5, 10600, -86.5), (1.5, 11100, -85), (2.1, 12000, -86.5), (4.4, 11500, -88),
          (5.302, 11700, -91), (6, 10500, -91.5), (6.4, 10560, -87), (7.799, 10900, -85),
          (8.299, 11750, -87.5), (9.85, 11500, -86)]
# (frequency [Hz], density [dB per Hz])
WASH = [(20, -89.5), (55, -80), (130, -82), (300, -83.5), (900, -91), (2400, -89.5), (3400, -97.5),
        (4050, -98), (4850, -106), (5300, -85.5), (6000, -88.5), (8800, -104), (13500, -103), (15200, -104)]
# (frequency [Hz], correlation [-1..1])
SAME = [(30, 0.88), (60, 1), (130, 0.33), (300, -0.25), (900, -0.72), (1800, 0.13), (4000, -0.65),
        (6000, 0.63), (14000, 0.75)]


def background():
    frames, hz = N // 256 + 5, np.fft.rfftfreq(1024, 1 / SR)[:, None]
    t = np.arange(frames) * 256 / SR
    a, b, c, d, patches = rng.standard_normal((frames, 513, 5)).T
    patches = evened(uniform_filter1d(uniform_filter1d(patches, size=12, axis=0), size=12, axis=1))
    s, centre, db = np.transpose(CHORUS)
    high = level_to_linear(np.interp(t, s, db) - 4.85 * ((hz - np.interp(t, s, centre)) / 1500) ** 2)
    low = level_to_linear(-82.5 - 6.5 * ((hz - 7350) / 450) ** 2)
    churn_db = np.interp(t, *np.transpose(CHURN)) + 68
    swell_db = 0.058 * churn_db * np.exp(-np.log(hz / 900 + 1e-3) ** 2 / 6.7)
    wash = level_to_linear(read(WASH, hz) + swell_db)
    same, left = np.clip(read(SAME, hz), -1, 1), a + 1j * b
    right = same * left + np.sqrt(1 - same ** 2) * (c + 1j * d)
    z = np.array([left, right])
    z *= np.sqrt(wash ** 2 + high ** 2 + low ** 2) * level_to_linear(1.6 * patches) * np.sqrt(SR / 1024)
    return signal.istft(z, nperseg=1024, noverlap=768)[1][:, :N]


def scene():
    pan = water() + ticks() + fizz() + bumps()
    cicada = cicada_drone() + cicada_glide() + cicada_buzz()
    return pan + cicada + cricket() + far_cicada() + background()


# (frequency [Hz], right lag [rad])
PORT = [(100, 0), (600, .22), (1500, .45), (2500, 1.1), (4200, 1.85), (5600, 3), (7000, 3.13),
        (15000, 3.14)]


def top_cut(x):
    return signal.sosfilt(signal.butter(12, 15100, fs=SR, output="sos"), x)


def record(dry):
    size = next_fast_len(N)
    turn = np.exp(-1j * read(PORT, np.fft.rfftfreq(size, 1 / SR)))
    right = irfft(rfft(dry[1], size) * turn, size)[:N]
    return top_cut(np.array([dry[0], right]))


dry = scene()
out = record(dry)
master_out(out)
```